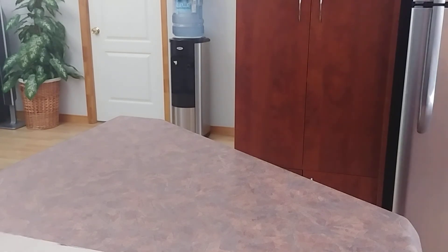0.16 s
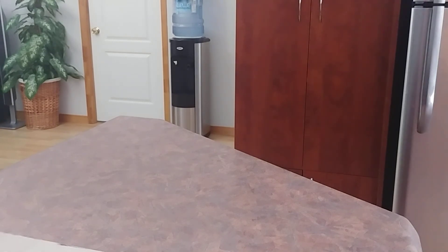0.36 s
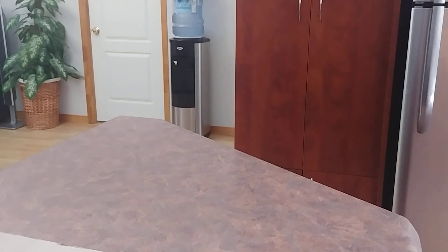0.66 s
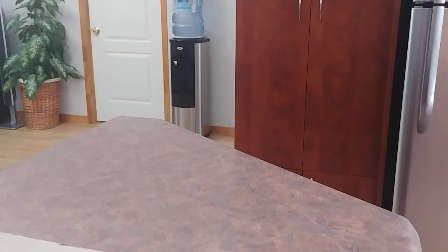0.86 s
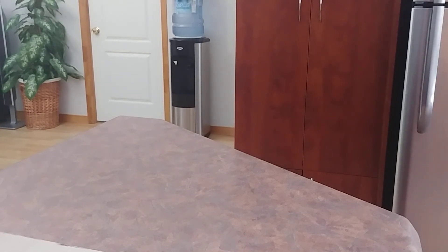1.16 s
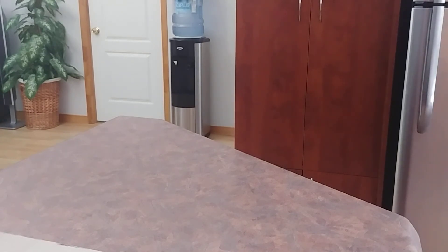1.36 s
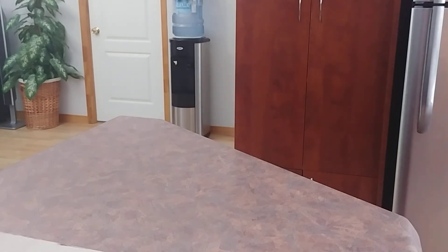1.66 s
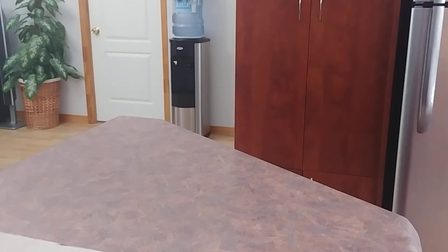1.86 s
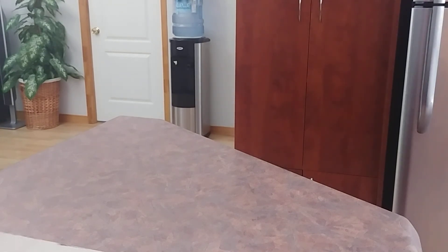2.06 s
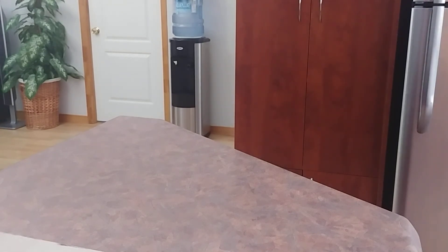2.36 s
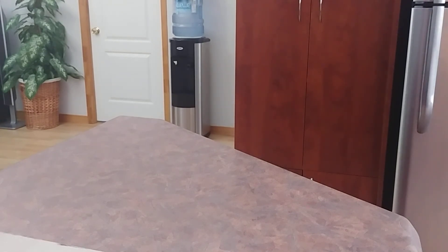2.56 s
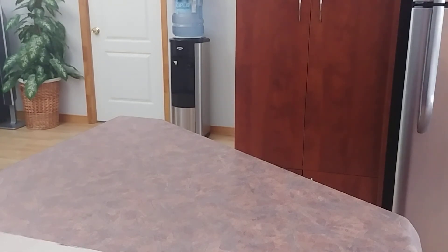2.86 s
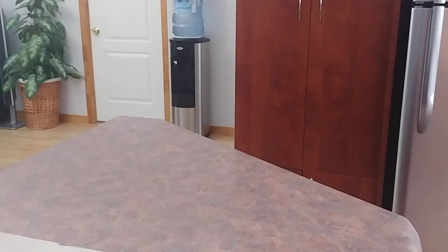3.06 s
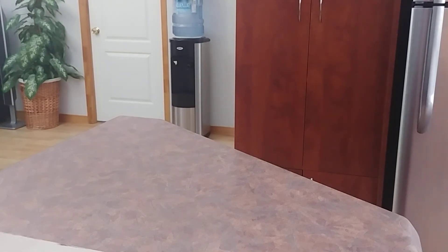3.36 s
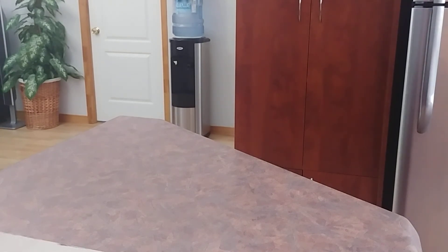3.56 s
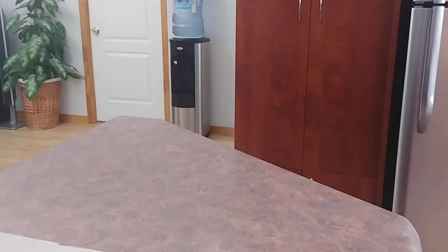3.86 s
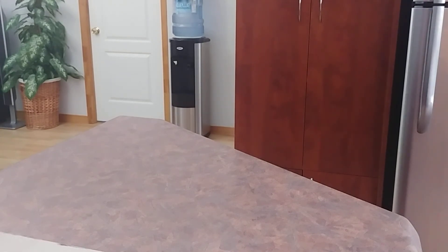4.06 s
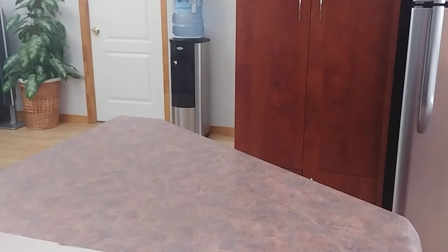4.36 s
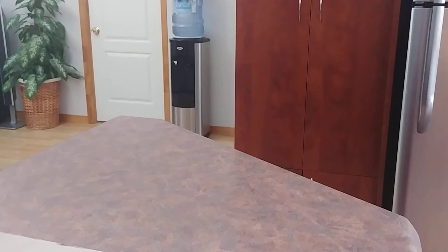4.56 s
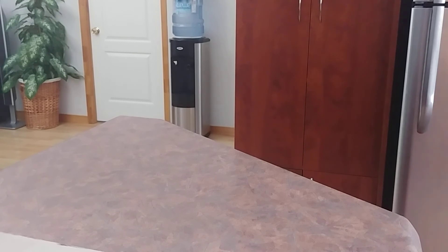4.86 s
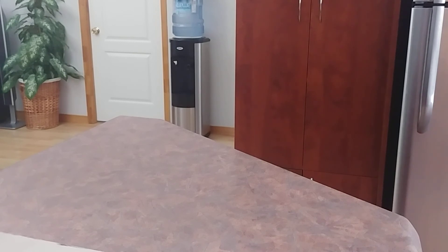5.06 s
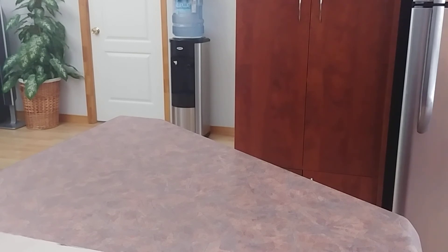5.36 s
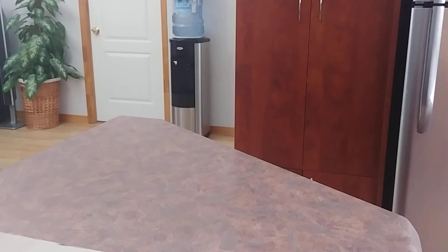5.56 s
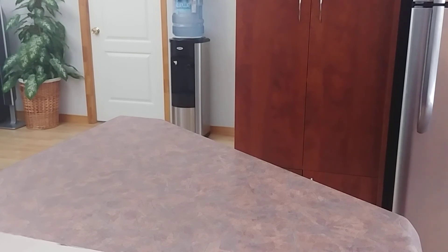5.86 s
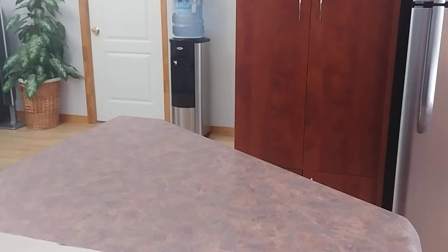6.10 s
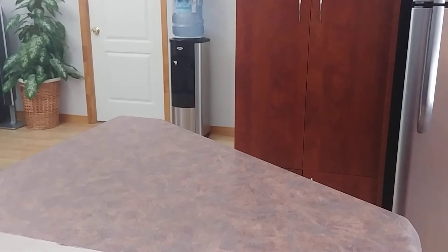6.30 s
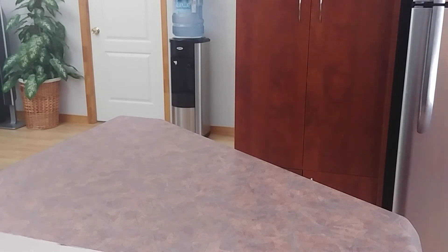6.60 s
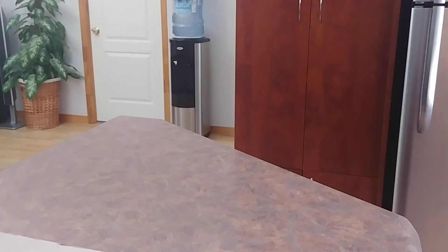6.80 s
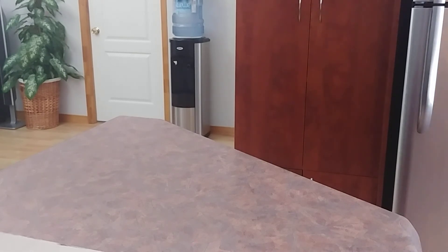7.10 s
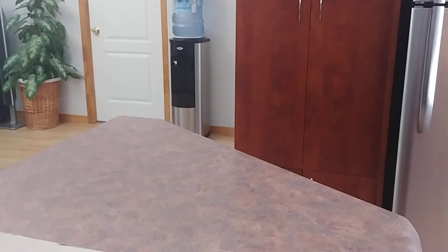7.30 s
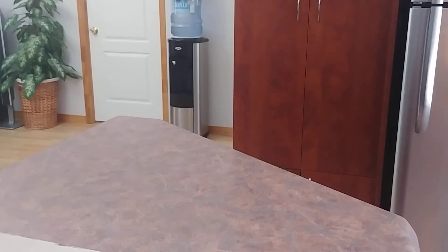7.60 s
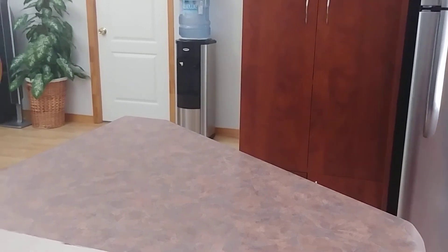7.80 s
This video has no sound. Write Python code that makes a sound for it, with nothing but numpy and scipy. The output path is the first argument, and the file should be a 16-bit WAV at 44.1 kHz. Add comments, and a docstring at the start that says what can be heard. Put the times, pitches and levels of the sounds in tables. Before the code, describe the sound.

A metal tray with a crinkling lining is handled, knocked and slid into a kitchen oven over a low hum.

```python
"""A kitchen, where a metal tray lined with crackling sheet is handled, knocked and slid into an oven.
Friction makes the rustle and scrape, folds of the sheet snap, and blows excite the modes of tray, rack
and oven walls. Footfalls and hollow bumps of the tray thud; a cooling motor and the mains hum steadily.
The tray is out of sight, so its airborne sound arrives only by reflection at two small microphones,
the right one more sensitive."""
import sys
import numpy as np
from scipy import signal
from scipy.fft import rfft, irfft, next_fast_len
from scipy.io import wavfile
from scipy.ndimage import uniform_filter1d

SR = 44100
rng = np.random.default_rng(int(sys.argv[2]) if len(sys.argv) > 2 else 0)


def file_out(sig):
    """Save sig as 16-bit WAV at sys.argv[1]."""
    # one column per channel
    cols = np.atleast_2d(sig).T
    # limit, then scale
    lim = np.clip(cols, -1, 1)
    pcm = np.round(lim * 32767).astype(np.int16)
    wavfile.write(sys.argv[1], SR, pcm)


N = 350154


def gain_of(db):
    """Decibel scale: 20 dB is a factor of ten in amplitude."""
    return 10 ** (np.asarray(db) / 20)


def unit_rms(x):
    """Normalisation to a mean power of one."""
    return x / np.sqrt(np.mean(x ** 2) + 1e-20)


def curve_at(points, hz):
    """Interpolation of (frequency, value) points on a log-frequency axis."""
    point_hz, value = np.transpose(points)
    return np.interp(np.log(hz + 1), np.log(point_hz + 1), value)


def add(mix, start_s, sound):
    """Superposition: a sound adds to the mix from its start time on."""
    part = mix[round(start_s * SR):][:len(sound)]
    part += sound[:len(part)]


def filtered(x, spectrum):
    """Zero-phase filtering by (frequency [Hz], gain [dB]) points."""
    size = next_fast_len(x.shape[-1])
    response = gain_of(curve_at(spectrum, np.fft.rfftfreq(size, 1 / SR)))
    return irfft(rfft(x, size) * response, size)[..., :x.shape[-1]]


def grains(size, spread_db):
    """Heavy-tailed noise: dense tiny snaps of random sign, of which a few stand out."""
    return unit_rms(rng.standard_normal(size) * gain_of(spread_db * np.minimum(rng.exponential(1, size), 5)))


def contact_pulse(rise_s):
    """Contact force: it builds to a peak of one, then relaxes exponentially."""
    u = np.arange(4096) / SR / rise_s
    return u * np.exp(1 - u)


def modal_response(modes, weights=1):
    """Modal superposition: damped sinusoids sum to an impulse response of unit energy."""
    hz, db, t60 = np.transpose(modes)[..., None]
    t = np.arange(SR) / SR
    partials = weights * gain_of(db - 60 * t / t60) * np.sin(2 * np.pi * hz * t)
    return unit_rms(partials.sum(0)) / np.sqrt(SR)


# Likeness of the sound at the two microphones: (frequency [Hz], correlation [-1 to 1])
MIC_CORRELATION = [(60, 0.94), (180, 0.83), (550, 0.53), (1650, -0.23), (4970, 0.12), (15000, -0.49)]
def microphone_pair(a, b):
    """Spatial coherence: two nearby points receive much the same bass but largely unrelated treble."""
    correlation = curve_at(MIC_CORRELATION, np.fft.rfftfreq(len(a), 1 / SR))
    right = correlation * rfft(a) + np.sqrt(1 - correlation ** 2) * rfft(b)
    return np.array([a, irfft(right, len(a))])


# Spectrum of still air and microphone hiss: (frequency [Hz], relative density [dB])
AIR_SPECTRUM = [(18, -47), (30, -21), (59, -31), (73, -5.5), (133, 1), (187, -10.5), (202, -31.5),
                (263, -4), (410, -26.5), (479, -20), (622, -20.5), (747, -25.5), (15500, -48.5)]
def air(level_db=-55.5):
    """Stationary noise: a steady floor of low rumble and faint hiss."""
    noise = microphone_pair(*rng.standard_normal((2, N)))
    return gain_of(level_db) * unit_rms(filtered(noise, AIR_SPECTRUM))


# Harmonics of the cooling motor: (order [multiple of the rotation rate], level [dB])
MOTOR_ORDERS = [(1, -69), (2, -72.5), (3, -56.5), (4, -61.5), (5, -70), (6, -67.5), (7, -73.5), (11, -75.5),
                (14, -84.5), (19, -86)]
# Tones of the mains: (frequency [Hz], level [dB])
MAINS_TONES = [(120, -58), (240, -68.5)]
def hum(rotation_hz=44.36, waver_db=2.0):
    """Beating: motor harmonics interfere with the mains tones, each wavering a little in level."""
    t, out = np.arange(N) / SR, np.zeros(N)
    motor_tones = [(order * rotation_hz, db) for order, db in MOTOR_ORDERS]
    for hz, db in motor_tones + MAINS_TONES:
        waver = unit_rms(uniform_filter1d(uniform_filter1d(rng.standard_normal(N), 6000), 6000))
        out += np.sqrt(2) * gain_of(db + waver_db * waver) * np.sin(2 * np.pi * (hz * t + rng.random()))
    return out


# Reverberation time of the kitchen: (frequency [Hz], T60 [s])
ROOM_DECAY = [(100, 0.65), (500, 0.38), (2000, 0.31), (8000, 0.21), (15000, 0.14)]
def reflections(build_up_s=0.0029):
    """Reverberation: sparse echoes build up quickly and decay exponentially, the treble first."""
    taps = np.zeros((2, SR))
    arrivals = np.arange(0, SR - 20, 20) + rng.integers(0, 20, (2, (SR - 1) // 20))
    np.put_along_axis(taps, arrivals, rng.choice([-1., 1.], arrivals.shape), 1)
    hz, t, bands = signal.stft(taps, SR, nperseg=256)
    decay = gain_of(-60 * t / curve_at(ROOM_DECAY, hz)[:, None])
    tail = signal.istft(bands * decay, SR, nperseg=256)[1][:, :SR]
    onset = 1 - np.exp(-np.arange(SR) / SR / build_up_s)
    response = microphone_pair(*(tail * onset))
    return response / np.linalg.norm(response[0])


def kitchen(x, turn_s=0.06):
    """Changing echo paths: as the tray shifts, three sets of reflections take turns at constant power."""
    angle = np.pi * np.arange(N) / SR / (3 * turn_s)
    shares = [np.sqrt(2 / 3) * np.cos(angle + k * np.pi / 3) for k in range(3)]
    return sum(signal.fftconvolve((x * share)[None], reflections(), axes=1)[:, :N] for share in shares)


# Footfalls and hollow bumps: (time [s], level [dB], upper edge of the thud [Hz])
THUDS = [(0.34, -44, 300), (0.39, -44.5, 302), (0.782, -63, 300), (2.635, -28.5, 900), (2.72, -33, 900),
         (2.88, -41, 800), (3.208, -43.5, 296), (5.1, -42, 800), (5.2, -44.5, 800), (5.39, -42.5, 1108),
         (5.45, -42, 1110), (6.149, -47, 500), (6.65, -43.5, 694), (6.786, -43, 600), (7.329, -46.5, 700),
         (7.597, -42, 795), (7.654, -35.5, 300), (7.729, -44.5, 617)]
def thuds(rise_s=0.0083):
    """Damped impact: a footfall or a hollow bump of the carried tray gives a short, dull thud."""
    out = np.zeros(N)
    for time_s, db, edge_hz in THUDS:
        spectrum = [(40, -12), (110, 0), (edge_hz, -9), (edge_hz * 2.05, -28), (16000, -60)]
        rumble = unit_rms(filtered(rng.standard_normal(4096), spectrum))
        add(out, time_s - 0.005, gain_of(db) * rumble * contact_pulse(rise_s))
    return out


def squeal(start_s=2.15, length_s=0.4, from_hz=3450, to_hz=3730, width_hz=120):
    """Friction-induced vibration: sliding metal sings a thin rising tone, broadened by noise."""
    progress = np.arange(0, length_s, 1 / SR) / length_s
    fuzz_spectrum = [(10, 0), (width_hz, -3), (width_hz * 4, -30), (16000, -60)]
    fuzz = unit_rms(filtered(rng.standard_normal(len(progress)), fuzz_spectrum))
    hz = from_hz + (to_hz - from_hz) * progress
    tone = fuzz * np.sin(2 * np.pi * np.cumsum(hz) / SR)
    out = np.zeros(N)
    add(out, start_s, gain_of(-51) * np.sin(np.pi * progress) * tone)
    return out


# Modes of the oven walls: (frequency [Hz], relative level [dB], T60 [s])
WALL_MODES = [(60.7, -3, .9), (97.6, -8, 0.6), (136.9, 15, 0.39), (148, 2, .2), (263, -12, 0.23)]
def wall_boom(force):
    """Panel resonance: the oven walls answer a force with a low boom."""
    return signal.oaconvolve(force, modal_response(WALL_MODES))[:N]


# Modes of the oven rack: (frequency [Hz], relative level [dB], T60 [s])
RACK_MODES = [(295.6, -6, 0.39), (336, -1.5, 1.2), (349.5, 0, 1.57)]
def rack_ring(force):
    """Lightly damped resonance: the rack rings on after the force has ended."""
    return signal.oaconvolve(force, modal_response(RACK_MODES))[:N]


# Modes of the tray: (frequency [Hz], relative level [dB], T60 [s])
TRAY_MODES = [(607, -21.5, .5), (635, 1.5, 1), (735.6, 5, 0.67), (837, -1, 0.36), (920, -22, 0.37),
              (965, -27, .4), (1160, -18.5, .4), (1213, -26, 0.33), (1297, -27.5, .4), (1480, 2.5, 0.11),
              (1326, 13, 0.66), (1610, -1.5, 0.22), (1710, -25, 0.26), (1900, -16.5, .3), (1915.5, 6, 1),
              (2203, 4, 0.26), (2400, -11, .3), (2890, -24, 0.27), (2876, 2, 0.36), (3560, -8, 0.097)]
def tray_ring(force, weights=1):
    """Plate resonance: a force excites the inharmonic modes of the tray, each by its weight."""
    return signal.oaconvolve(force, modal_response(TRAY_MODES, weights))[:N]


# Spectrum of metal striking metal: (frequency [Hz], gain [dB])
CLATTER_SPECTRUM = [(88, -6), (150, -3.5), (260, -8), (352, -1.5), (477, -7.5), (812, -2), (1380, -1.5),
                    (1590, -0.5), (7000, -14.5), (9100, -66.5), (15400, -120)]
def clatter(force):
    """Contact noise: brief metal contacts radiate over a broad band."""
    return filtered(force, CLATTER_SPECTRUM)


# Snaps of the sheet: (time [s], level [dB], centre frequency [Hz], treble relative to centre [dB])
CRACKLES = [(0.1032, -28.5, 5540, -4), (0.2394, -43.5, 4330, -7), (0.3895, -45.5, 6200, -5),
            (0.5861, -31.5, 5940, 1.5), (0.7652, -36.5, 3100, -3.5), (0.8754, -43, 5700, 0),
            (0.9223, -28, 2900, 0.5), (1.0194, -38.5, 4800, -3), (1.1443, -38, 2950, -11.5),
            (1.2017, -38, 2900, 9), (1.3972, -47, 2610, -7), (1.499, -24.5, 2210, 14),
            (2.0577, -35, 2890, -17), (2.4818, -33.5, 3380, -14.5), (2.822, -26, 4550, -5.5),
            (3.0086, -27.5, 5000, -3), (3.1847, -29, 4525, -2.5), (3.262, -29, 3530, -1.5),
            (3.5139, -40, 5680, -12), (3.868, -23.5, 2880, -24), (4.2697, -40, 2090, -15),
            (4.4204, -39, 4830, -4), (4.5555, -37.5, 6100, -1), (4.9, -30.5, 6550, 6.5),
            (5.0644, -22.5, 6250, -8.5), (5.1694, -26, 6100, -8), (5.2944, -43, 7000, -13),
            (5.641, -40.5, 4800, -1.5), (5.8197, -42.5, 3330, -2), (6.136, -48.5, 5450, -6),
            (6.566, -58, 5070, -25), (6.7486, -36.5, 2350, -18), (7.214, -43.5, 5130, 2),
            (7.6246, -37, 7100, -2), (7.7994, -48, 4240, -24)]
def crackles(rise_s=0.0066):
    """Buckling: each fold of the sheet snaps in a burst of noise, coloured by the size of the fold."""
    out = np.zeros(N)
    for time_s, db, hz, treble_db in CRACKLES:
        spectrum = [(hz / 4, -22), (hz / 1.4, -5), (hz / 1.07, 0), (hz * 1.15, 0),
                    (hz * 1.2, treble_db / 2), (16000, treble_db)]
        snap = unit_rms(filtered(grains(4096, spread_db=1.0), spectrum))
        add(out, time_s - rise_s, gain_of(db) * snap * contact_pulse(rise_s))
    return out


# Rustle of sheet and cloth: (frequency [Hz], relative density [dB])
RUSTLE_SPECTRUM = [(500, -16), (1500, -12.5), (2700, 0.5), (4500, 0), (7000, -2.5), (16000, -4)]
# Hollow drag of the carried tray: (frequency [Hz], gain [dB])
SLIDE_SPECTRUM = [(150, 13.5), (330, 12.5), (650, 16), (1000, 11), (1600, 7), (3000, 6), (9000, -17)]
# Continuous slight motion of the load: (time [s], rustle level [dB], slide drive [dB])
CARRYING = [(0.0, -63, -69), (0.5, -56, -70), (1.45, -61, -73), (1.7, -58.5, -47), (2.15, -48.5, -47),
            (2.45, -49.5, -57), (2.8, -48.5, -37.5), (3.15, -47, -59), (3.5, -55.5, -60.5),
            (3.95, -39.5, -49), (4.25, -47.5, -54), (4.5, -57, -61.5), (4.68, -56, -59),
            (4.87, -60.5, -63.5), (5.25, -43.5, -54), (5.5, -73, -61.5), (6.0, -62.5, -67.5),
            (6.35, -71, -87), (6.6, -66.5, -62), (7.1, -71, -78.5), (7.94, -67, -73)]
# Separate strokes of the hands: (start [s], hold [s], rustle level [dB], scrape drive [dB])
STROKES = [(0.0, 0.0073, -40.5, -53.5), (0.082, 0.011, -38.5, -49.5), (0.262, 0.024, -45.5, -60),
           (0.371, 0.018, -61, -55.5), (0.56, 0.19, -51.5, -71), (0.866, 0.067, -42, -62),
           (1.008, 0.015, -76, -79), (1.123, .12, -52.5, -69), (1.412, 0.089, -65, -74),
           (1.488, 0.087, -35.5, -29), (1.612, 0.037, -33.5, -37.5), (1.751, 0.021, -45.5, -72.5),
           (1.909, 0.041, -50.5, -51), (1.972, 0.1, -50.5, -43), (2.48, 0.17, -46, -51.5),
           (2.584, 0.013, -28, -23.5), (2.651, 0.037, -43, -38.5), (2.804, 0.11, -34, -49),
           (2.994, 0.089, -48.5, -59.5), (3.185, .04, -42.5, -46), (3.263, 0.096, -51, -46),
           (3.343, 0.04, -38, -52.5), (3.495, 0.12, -55.5, -61), (3.638, 0.019, -23, -19.5),
           (3.713, 0.13, -57.5, -35), (3.851, 0.029, -32, -32.5), (3.956, 0.14, -42, -51),
           (4.248, .07, -54.5, -69), (4.352, 0.023, -44.5, -123.5), (4.51, 0.014, -52, -54),
           (4.912, 0.12, -36, -51.5), (5.023, 0.15, -37.5, -46), (5.34, 0.17, -61, -66),
           (5.55, 0.015, -52, -68), (5.63, 0.029, -53, -62.5), (5.754, 0.058, -49, -88),
           (6.078, 0.099, -60.5, -61.5), (6.613, 0.14, -52.5, -68), (7.183, 0.08, -55.5, -62.5),
           (7.253, 0.048, -47.5, -58), (7.596, 0.095, -51, -58), (7.687, 0.045, -55, -50.5),
           (7.77, 0.016, -52, -58)]
def handling(attack_s=0.005, swell_share=0.083, release_db_per_s=403):
    """Stick-slip friction: the sheet rustles, and tiny slips of tray on rack excite the modes of both."""
    t = np.arange(N) / SR
    times, carry_rustle_db, slide_db = np.transpose(CARRYING)
    rustle_envelope, scrape_envelope = gain_of(np.interp(t, times, carry_rustle_db)), np.zeros(N)
    slide_envelope = gain_of(np.interp(t, times, slide_db))
    slide = filtered(grains(N, spread_db=4.0) * slide_envelope, SLIDE_SPECTRUM)
    age = t[:SR // 2]
    for start_s, hold_s, rustle_db, scrape_db in STROKES:
        rise = np.minimum(age / (attack_s + swell_share * hold_s), 1)
        release = gain_of(-release_db_per_s * np.maximum(age - attack_s - hold_s, 0))
        add(rustle_envelope, start_s, gain_of(rustle_db) * rise * release)
        add(scrape_envelope, start_s, gain_of(scrape_db) * rise * release)
    rustle = unit_rms(filtered(grains(N, spread_db=4.5), RUSTLE_SPECTRUM)) * rustle_envelope
    slips = grains(N, spread_db=4.0) * scrape_envelope
    friction = slips + slide / 4
    ring = gain_of(-15.5) * tray_ring(friction) + gain_of(-19) * rack_ring(friction)
    return rustle + slide + gain_of(11) * clatter(slips) + ring


BLOW_RISE_S = 0.01106
# Blows of the tray: (time [s], chatter drive [dB], wall drive [dB], rack drive [dB], place on tray [0-1])
KNOCKS = [(1.512, -55, -25, -1, 0.3), (1.57, -49, -11, 0, 0.6), (1.649, -39, -13, 1, 0.04),
          (1.889, -49.5, -12, -1.5, 0.1), (2.056, -44, -7, -6, 0.5), (2.598, -30.5, 7, 14.5, 0.5),
          (2.689, -55, -13.5, 9.5, 0), (2.825, -34.5, -6.5, 15, 0.37), (2.91, -50.5, -4, -5, 0.3),
          (3.263, -40, -12, -14.5, 0), (3.379, -57.5, -12, -30.5, 0.45), (3.65, -22, 6, -8, 0.5),
          (3.709, -30, -14, -0.5, 0.6), (3.872, -29, 6.5, 9, 0.15), (4.266, -61, -14.5, 2, 0.1),
          (5.065, -38, -7.5, -1, 0), (5.43, -54.5, -11, -12.5, 0.5)]
def knocks():
    """Impact excitation: each blow chatters and rings the tray, least in modes with a node at that place."""
    out = np.zeros(N)
    for time_s, db, _, _, place in KNOCKS:
        chatter = gain_of(db) * contact_pulse(BLOW_RISE_S) * grains(4096, spread_db=4.5)
        mode_weights = 0.2 + np.cos(np.pi * place * np.arange(len(TRAY_MODES)))[:, None] ** 2
        add(out, time_s - 0.006, gain_of(15) * clatter(chatter))
        add(out, time_s - 0.006, gain_of(-11) * tray_ring(chatter, mode_weights))
    return out


def oven_frame():
    """Structure-borne sound: each blow jolts walls and rack, and floor and counter carry their ringing."""
    wall_force, rack_force = np.zeros((2, N))
    jolt = 0.0139 * contact_pulse(rise_s=0.001)
    for time_s, _, wall_db, rack_db, _ in KNOCKS:
        add(wall_force, time_s + BLOW_RISE_S, gain_of(wall_db) * jolt)
        add(rack_force, time_s + BLOW_RISE_S, gain_of(rack_db) * jolt)
    return wall_boom(wall_force) + rack_ring(rack_force)


# Response of the microphone port: (frequency [Hz], gain [dB])
PORT_RESPONSE = [(30, -31.5), (52, -12.5), (62, -3.5), (6800, -1.5), (7800, 7), (9200, -7.5),
                 (10500, -25.5), (11300, -16.5), (15500, -8.5)]
def scene():
    """Parallel transmission: sound through room and structure passes the port; hum and air lie under it."""
    bumps = thuds()
    airborne = handling() + crackles() + knocks() + squeal() + gain_of(-1.5) * bumps
    structure_borne = oven_frame() + gain_of(-4) * bumps
    return filtered(kitchen(airborne) + structure_borne, PORT_RESPONSE) + hum() + air()


# Unequal sensitivity of the microphones: (frequency [Hz], left minus right [dB])
MIC_IMBALANCE = [(60, -5.5), (150, -4.5), (380, -6), (950, -6), (2380, -5.5), (5980, -5.5), (15000, -14)]
BAND_LIMIT_HZ = 15900
def record(dry):
    """Transducer response: the right microphone is the more sensitive, and both are band-limited."""
    left = filtered(dry[0], [(hz, db / 2) for hz, db in MIC_IMBALANCE])
    right = filtered(dry[1], [(hz, -db / 2) for hz, db in MIC_IMBALANCE])
    low_pass = signal.firwin(511, BAND_LIMIT_HZ, window=("kaiser", 9), fs=SR)
    return signal.oaconvolve(np.array([left, right]), low_pass[None], "same")


dry = scene()
out = record(dry)
file_out(out)
```